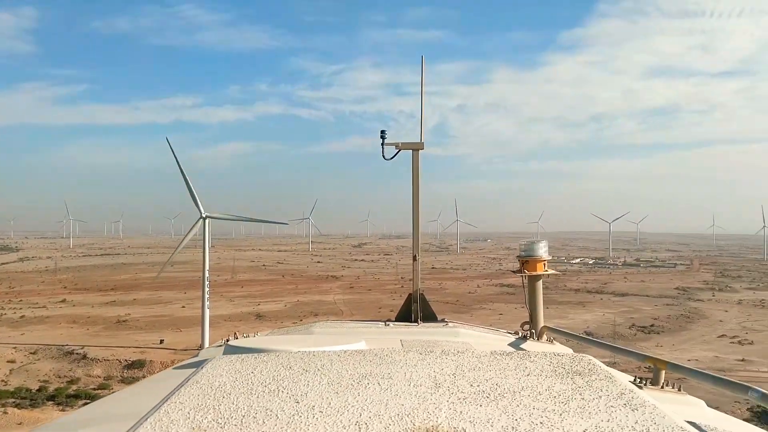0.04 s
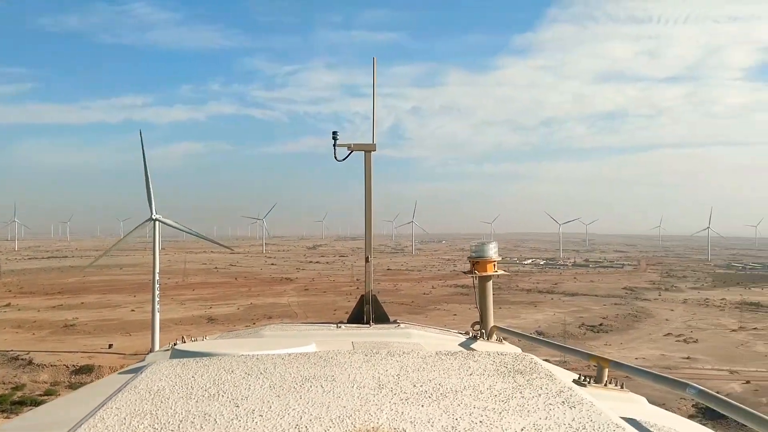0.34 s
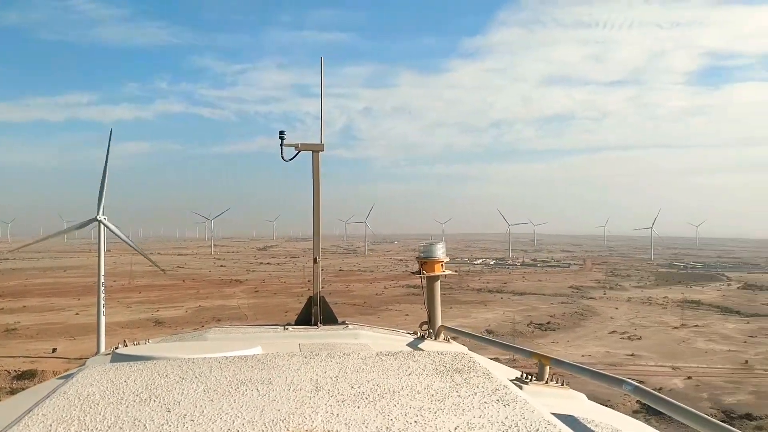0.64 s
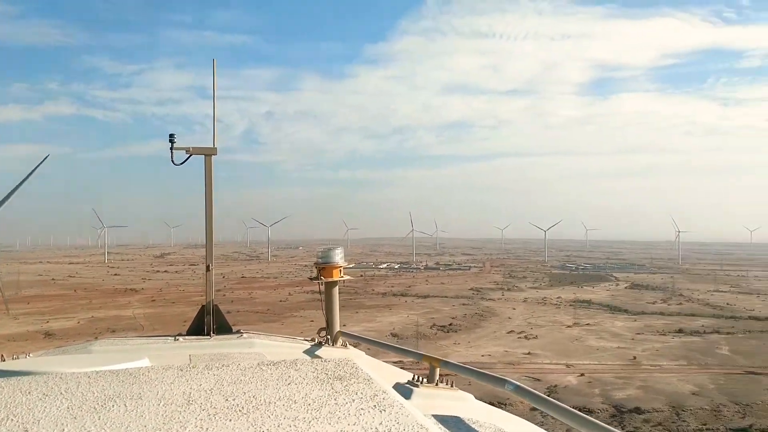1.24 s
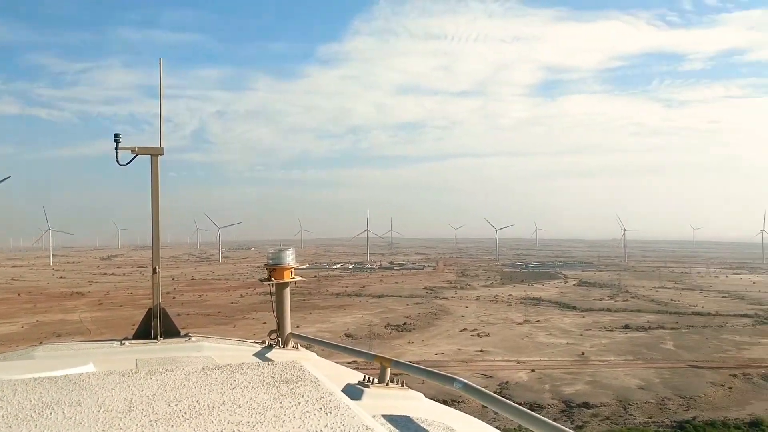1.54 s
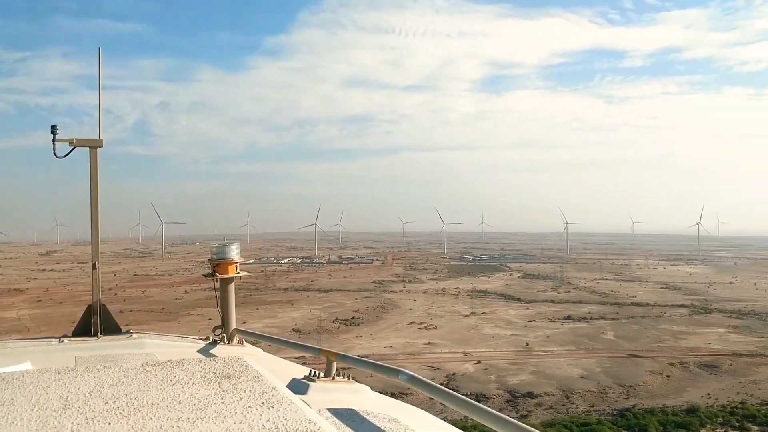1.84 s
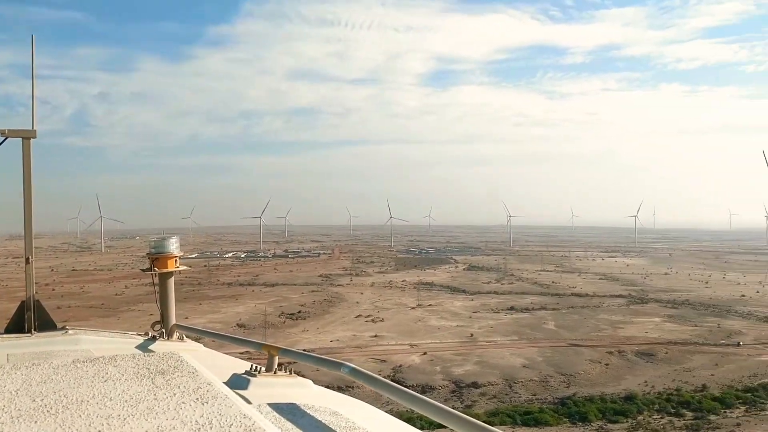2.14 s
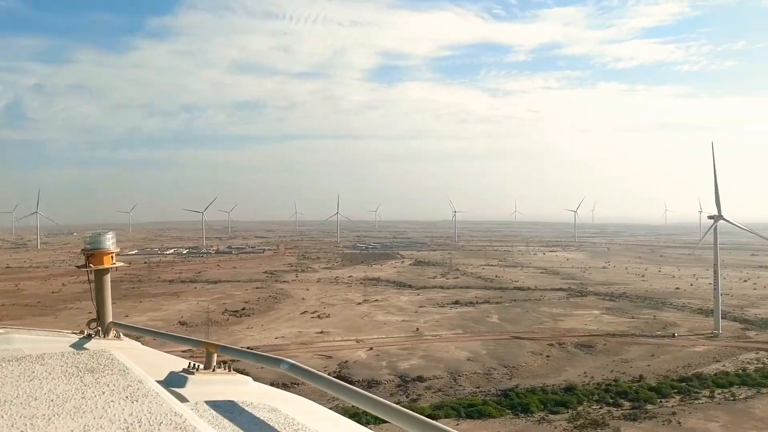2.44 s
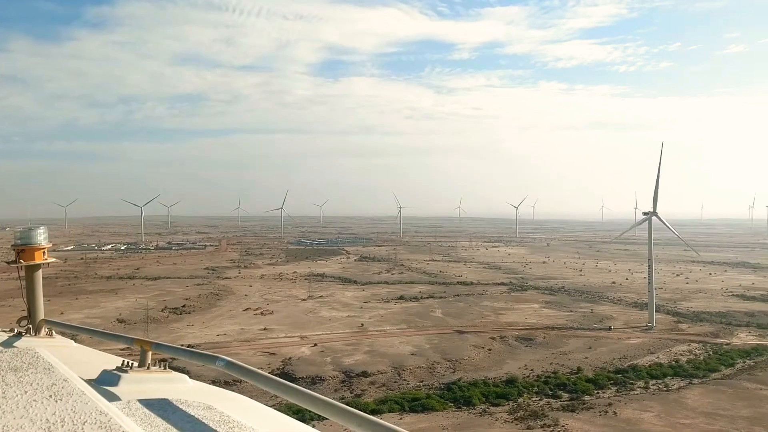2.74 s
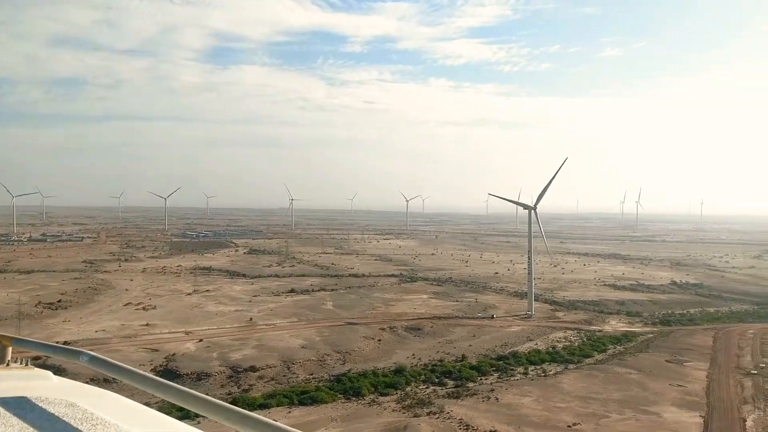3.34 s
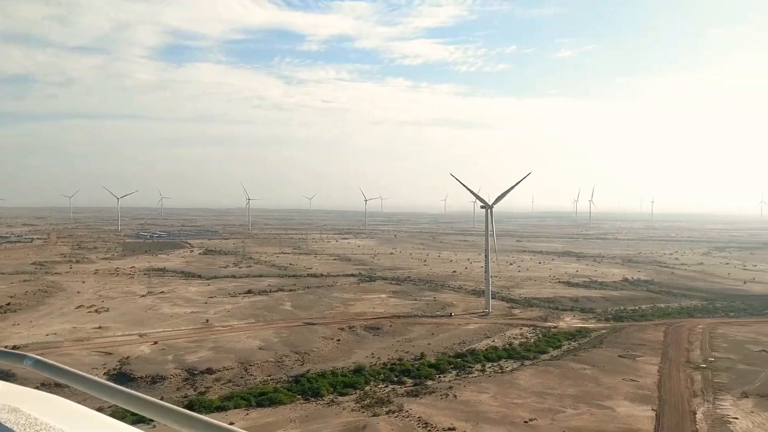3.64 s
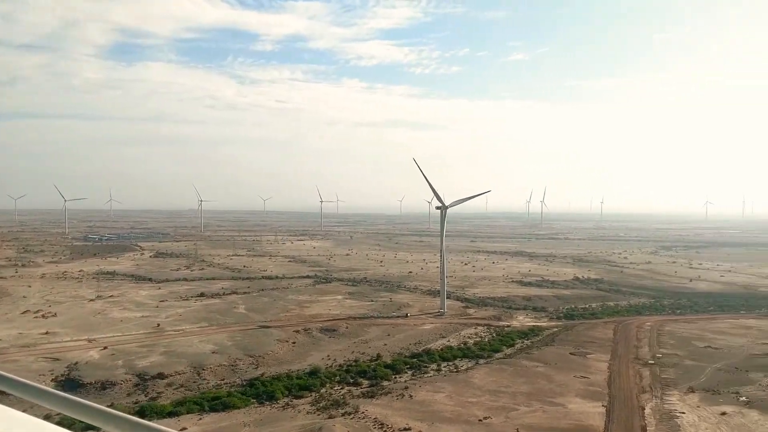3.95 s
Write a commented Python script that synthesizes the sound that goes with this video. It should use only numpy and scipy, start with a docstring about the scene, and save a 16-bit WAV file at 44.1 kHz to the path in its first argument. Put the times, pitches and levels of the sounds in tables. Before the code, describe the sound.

Gusty wind buffets the microphone over a steady rush of wind turbine machinery.

```python
"""Wind on top of a turbine tower, high above a dry plain. From the start, gusts buffet the two ports of
a small microphone, over the machine housing's steady rush, hollow resonances, faint gear hum, thin
whistles and fluttering hiss. Two early eddies thump against the windward port, then the wind lulls.
It returns near 0.9 s, the housing ticks at 1.2 s, and the hardest gust brings a crowd of thumps near
1.8 s. Weaker gusts and scattered thumps follow to the end, with two more faint ticks just after 3 s."""
import sys
import numpy as np
from scipy import signal
from scipy.fft import rfft, irfft
from scipy.io import wavfile
from scipy.ndimage import uniform_filter1d

SR = 44100
rng = np.random.default_rng(int(sys.argv[2]) if len(sys.argv) > 2 else 0)


def int16_out(signal):
    """Quantize to a 16-bit WAV file."""
    q = np.round(np.clip(np.atleast_2d(signal).T, -1, 1) * 32767)
    wavfile.write(sys.argv[1], SR, q.astype(np.int16))


N = 176400
T = np.arange(N) / SR
HZ = np.maximum(np.fft.rfftfreq(N, 1 / SR), 1)
PORT_NULL_HZ = 2197   # sound takes one cycle to travel between the ports

# Strength of the buffeting. Each row: time in seconds, level in dB.
GUST_LEVEL = [(0, -24), (0.11, -31), (0.27, -31), (0.32, -42), (0.4, -33), (0.46, -43), (0.76, -41),
              (0.9, -29.5), (1.16, -28.5), (1.22, -36), (1.36, -28), (1.45, -30), (1.52, -25), (1.63, -22),
              (1.71, -23), (1.735, -19.5), (1.8, -19.5), (1.87, -20.5), (1.92, -28), (1.96, -25),
              (2.03, -24), (2.07, -36), (2.15, -31), (2.22, -37), (2.37, -38), (2.43, -27), (2.53, -26),
              (2.62, -28), (2.72, -25), (2.8, -36), (2.88, -26), (3.1, -33), (3.21, -44), (3.28, -29),
              (3.57, -33), (3.65, -28), (3.82, -30), (3.88, -23), (4, -24)]
# Spectra of the rumble and of the rougher flutter. Each row: frequency in Hz, relative density in dB.
RUMBLE_SPECTRUM = [(15, -54), (28, -40), (40, -21), (60, 5), (100, 4.5), (170, -1.5), (250, -10),
                   (350, -27), (600, -52), (1200, -83), (5000, -130)]
FLUTTER_SPECTRUM = [(90, 2.5), (200, -2), (310, -3.5), (430, -12), (600, -16.5), (900, -41), (1800, -62),
                    (5000, -120)]
# Rush of cooling air and drive train. Each row: frequency in Hz, density in dB before the gains below.
RUSH_SPECTRUM = [(30, -86), (100, -77), (200, -68.5), (340, -73), (490, -70.5), (600, -71.5), (760, -76),
                 (1030, -78), (1240, -75), (1420, -76), (1900, -77), (2300, -86), (2800, -87), (3500, -95),
                 (4500, -96.5), (5900, -99), (8000, -108), (10000, -117), (16000, -126)]
# Swell of the rush's low and high parts. Each row: time in seconds, gain in dB.
RUSH_LOW_GAIN = [(0, 3.5), (.3, 2.5), (.7, 3), (1.3, 2.5), (1.8, 2), (2.05, 2), (2.7, 2.1), (3.1, 3),
                 (3.5, 2), (4, 0)]
RUSH_HIGH_GAIN = [(0, 1.8), (.3, 0.43), (.8, -1.9), (1.4, -2.2), (1.8, 0.74), (2.05, 0.86), (2.45, 1),
                  (2.8, -1.5), (3.5, -2.2), (4, -1.4)]
# Difference between the ports against their sum, for the rush. Each row: frequency in Hz, weight in dB.
SIDE_WEIGHT = [(100, -24), (500, -6), (1100, -2.5), (1700, -1.5), (3000, 1), (9000, 1)]
# Part of that difference arriving from one direction. Each row: frequency in Hz, coherence from 0 to 1.
SIDE_COHERENCE = [(200, 1), (600, 0.94), (1800, 0.82), (2800, 0.6), (5000, 0.7), (9000, .1)]
# Phase of that directed part. Each row: frequency in Hz, phase in radians.
SIDE_PHASE = [(250, -0.3), (500, -0.8), (1100, -1.3), (1800, -2), (2700, -1.1), (3800, -2), (5000, -1.2)]
# Strength of the housing's two airy resonances. Each row: time in seconds, relative level in dB.
UPPER_HOLLOW_LEVEL = [(0, -45), (0.2, -50), (0.75, -59), (1.02, -51), (1.35, -61), (1.83, -44.5),
                      (2.02, -53.5), (2.5, -46.5), (2.75, -51), (3.6, -55.5), (4, -49.5)]
LOWER_HOLLOW_LEVEL = [(0, -49.5), (.28, -44.5), (.6, -50), (.9, -62), (1.4, -65), (4, -64)]
# Pitch of the upper resonance. Each row: time in seconds, centre frequency in Hz.
UPPER_HOLLOW_PITCH = [(0, 1250), (.5, 1255), (.95, 1205), (1.4, 1244), (1.8, 1228), (2.07, 1280),
                      (2.5, 1220), (3.2, 1266), (4, 1255)]
# Gear hum and thin whistles. Each row: frequency in Hz, level in dB before channel gain, half width in Hz.
GEAR_PARTIALS = [(376, -54.5, 3), (484, -54.5, 3), (578, -57.5, 4), (652, -59, 3), (889, -61, 2),
                 (1222, -59, 5), (1262, -57.5, 3), (1298, -61, 4), (3042, -77, 8), (4000, -81, 2)]
WHISTLE_PARTIALS = [(3040, -68, 50), (9000, -74, 230), (12000, -82, 300), (15050, -87, 300)]
# Air hissing past the housing. Each row: frequency in Hz, density in dB before flicker and channel gain.
HISS_SPECTRUM = [(2500, -130), (4400, -118), (5200, -106), (6000, -104), (6450, -108), (6900, -101),
                 (7800, -103), (8800, -105), (10000, -112), (11500, -120), (16000, -128)]
# Brief swells of the hiss. Each row: centre in seconds, gain in dB, half length in seconds.
HISS_SURGES = [(.23, 2.5, .03), (.86, 2.5, .025), (1.29, 3, .02), (1.78, 2.5, .04), (2.06, 4, .07),
               (2.15, 4, .022), (3.12, 3, .025), (3.26, 3.5, .035), (3.65, 4.5, .025), (3.95, 3, .02)]
# Eddies on the windward port. Each row: centre in seconds, relative level in dB, pitch in Hz,
# half length in cycles.
EDDY_THUMPS = [(0.046, -18, 159, .6), (0.263, -21, 95, .6), (0.897, -18, 110, .35),
               (1.052, -14.5, 133, .35), (1.404, -12, 133, .45), (1.497, -16, 145, .45),
               (1.621, -14, 209, .4), (1.683, -16.5, 290, .4), (1.687, -13, 121, .45), (1.734, -8, 185, .6),
               (1.75, -7, 159, .45), (1.773, -11, 121, .7), (1.787, -15, 220, .5), (1.824, -7, 145, .4),
               (1.866, -7.5, 135, .45), (1.882, -12, 101, .7), (1.965, -12, 130, .4),
               (2.031, -18.5, 145, .8), (2.413, -10.5, 185, .5), (2.446, -10.5, 133, .6),
               (2.505, -13, 133, .45), (2.567, -9, 165, .3), (2.573, -11, 101, .7), (3.348, -11, 145, .47),
               (3.379, -17, 150, .4), (3.396, -10.5, 130, .52), (3.507, -9, 159, .45),
               (3.632, -14.5, 110, .75), (3.74, -10.5, 159, .6), (3.865, -11.5, 121, .6),
               (3.998, -11, 133, .35)]
# Small ticks of the housing. Each row: start in seconds, initial level in dB.
HOUSING_TICKS = [(1.187, -45), (3.05, -50), (3.062, -49)]


def from_db(db):
    """Amplitude grows tenfold for every 20 dB."""
    return 10 ** (np.asarray(db) / 20)


def rms_one(x):
    """Division by the rms gives unit power."""
    return x / np.sqrt(np.mean(x ** 2) + 1e-20)


def in_time(rows):
    """Linear interpolation gives a control curve at every sample."""
    return np.interp(T, *np.transpose(rows))


def over_hz(rows):
    """Interpolation on a log axis gives a value at every frequency."""
    hz, value = np.transpose(rows)
    return np.interp(np.log(HZ), np.log(hz), value)


def white():
    """White noise has equal mean power at all frequencies; this is its spectrum at 0 dB per Hz."""
    return rfft(rng.standard_normal(N)) * np.sqrt(SR / 2)


def noise(spectrum):
    """Spectral weighting colours white noise."""
    return irfft(white() * from_db(over_hz(spectrum)), N)


def band(hz, half_width):
    """A resonance curve selects a band of noise, rms 1; around 0 Hz it is a slow drift."""
    return rms_one(irfft(white() / (1 + ((HZ - hz) / half_width) ** 2), N))


def evened(x, span_s):
    """Division by the running rms holds the level of a noise near 1."""
    span = max(int(span_s * SR), 3)
    power = uniform_filter1d(uniform_filter1d(x * x, span), span)
    return x / np.sqrt(np.abs(power) + 1e-20)


def turbulence(lump_db=4.0, lump_hz=22, hard_gust_db=-20, flutter_growth=2.2):
    """Turbulent pressure on one port: flutter grows faster than rumble, so hard gusts are brighter."""
    lumps = np.tanh(evened(band(0, lump_hz), 0.062))
    gust_db = in_time(GUST_LEVEL) + lump_db * lumps
    rumble = from_db(gust_db - 0.5) * evened(noise(RUMBLE_SPECTRUM), 0.018)
    flutter_db = hard_gust_db - 8 + flutter_growth * (gust_db - hard_gust_db)
    return rumble + from_db(flutter_db) * evened(noise(FLUTTER_SPECTRUM), 0.0096)


def machine_rush(split_hz=1020):
    """Interference across the port spacing combs the sum and difference of broad machine noise in turn."""
    common, coherence = white(), np.clip(over_hz(SIDE_COHERENCE), 0, 1)
    directed = coherence * np.exp(1j * over_hz(SIDE_PHASE)) * common
    across = directed + np.sqrt(1 - coherence ** 2) * white()
    half_lag_rad = np.pi * HZ / PORT_NULL_HZ
    mid, side = np.sin(half_lag_rad), np.cos(half_lag_rad) * from_db(over_hz(SIDE_WEIGHT))
    stereo = (mid * common + side * across * [[1], [-1]]) / np.hypot(mid, side)
    stereo *= from_db(over_hz(RUSH_SPECTRUM))
    low_share = 1 / (1 + (HZ / split_hz) ** 6)
    low, high = irfft(stereo * low_share, N), irfft(stereo * (1 - low_share), N)
    return from_db(in_time(RUSH_LOW_GAIN)) * low + from_db(in_time(RUSH_HIGH_GAIN)) * high


def hollow_notes(upper_half_width_hz=65, lower_hz=545):
    """Air blown across openings excites two broad resonances; the upper one wanders in pitch."""
    phase = 2 * np.pi * np.cumsum(in_time(UPPER_HOLLOW_PITCH)) / SR
    upper = rms_one(sum(band(0, upper_half_width_hz) * wave(phase) for wave in (np.cos, np.sin)))
    upper *= from_db(in_time(UPPER_HOLLOW_LEVEL) - 2.5)
    lower = from_db(in_time(LOWER_HOLLOW_LEVEL)) * band(lower_hz, half_width=130)
    return upper * from_db([[1.5], [0]]) + lower * from_db([[3.5], [0]])   # both lean left


def hum_and_whistles():
    """Narrow noise bands are heard as wavering tones: gear hum leaning left, whistles on the right."""
    hum = sum(from_db(db) * band(hz, width) for hz, db, width in GEAR_PARTIALS)
    whistles = sum(from_db(db) * band(hz, width) for hz, db, width in WHISTLE_PARTIALS)
    return hum * from_db([[-2], [-5]]) + whistles * from_db([[-24], [0]])


def air_hiss(flicker_db=2.5, flicker_hz=26):
    """Random amplitude modulation makes the hiss of air flutter, louder and livelier on the right."""
    gain_db = flicker_db * evened(band(0, flicker_hz), 0.2)
    gain_db += sum(db * np.exp(-.5 * ((T - s) / width) ** 2) for s, db, width in HISS_SURGES)
    left = noise(HISS_SPECTRUM) * from_db(-2.5 + 0.85 * gain_db)
    right = noise(HISS_SPECTRUM) * from_db(gain_db)
    return np.array([left, right])


def eddies(trim_db=.5, roughness_db=-19):
    """A passing eddy is one short swing of pressure, heard as a thump with a rough edge."""
    thumps = np.zeros(N)
    roughness = from_db(roughness_db) * evened(noise(FLUTTER_SPECTRUM), 0.0047)
    for (centre, db, hz, half_length), turn in zip(EDDY_THUMPS, rng.random(len(EDDY_THUMPS))):
        cycles = (T - centre) * hz
        envelope = from_db(db + trim_db) * np.exp(-.5 * (cycles / half_length) ** 2)
        thumps += envelope * (np.cos(2 * np.pi * (cycles + turn)) + roughness)
    return thumps


def wind_on_ports(lee_db=-17, leak_db=-19):
    """Each channel is its own port minus the delayed other, so buffeting comes out in opposite phase."""
    ports = np.array([from_db(lee_db) * turbulence(), turbulence() + eddies()])   # right is windward
    delayed = np.array([np.interp(T - 1 / PORT_NULL_HZ, T, port) for port in ports])
    unshared = from_db(leak_db) * np.array([turbulence(), turbulence()])
    return ports - delayed[::-1] + unshared


def housing_ticks(hz=2950, half_width_hz=650, decay_s=.009):
    """Noise with a sudden onset and a fast exponential decay is heard as a faint, scratchy tick."""
    envelope = sum(from_db(db) * (T > s) * np.exp(-np.abs(T - s) / decay_s) for s, db in HOUSING_TICKS)
    return envelope * np.array([band(hz, half_width_hz), band(hz, half_width_hz)])


def scene():
    """Pressures add by superposition: buffeting over the steady machinery."""
    return (wind_on_ports() + machine_rush() + hollow_notes() + hum_and_whistles()
            + air_hiss() + housing_ticks())


def record(dry, low_cut_hz=32, high_cut_hz=15750):
    """The microphone is band-limited: it cuts the deepest bass, adds its own hiss and cuts the top."""
    self_noise = np.array([from_db(db) * irfft(white(), N) for db in (-108, -116.5)])   # left, right
    wind_filter = signal.butter(4, low_cut_hz, "high", fs=SR, output="sos")
    top_filter = signal.ellip(10, .1, 70, high_cut_hz, fs=SR, output="sos")
    fade_in = np.minimum(T / .004, 1)
    return signal.sosfilt(top_filter, signal.sosfilt(wind_filter, dry * fade_in) + self_noise)


dry = scene()
out = record(dry)
int16_out(out)
```